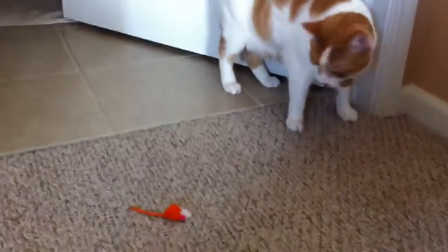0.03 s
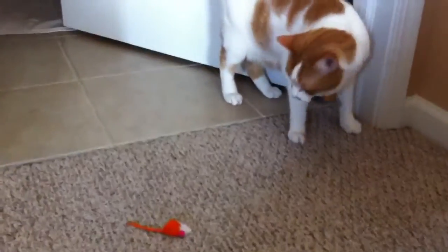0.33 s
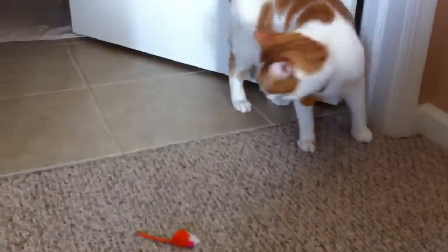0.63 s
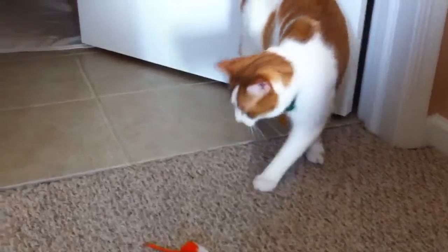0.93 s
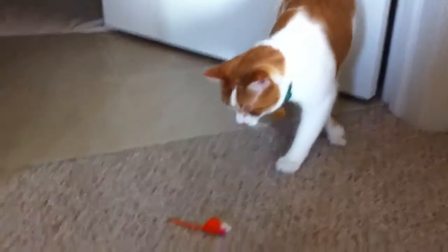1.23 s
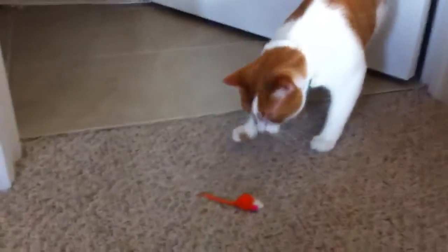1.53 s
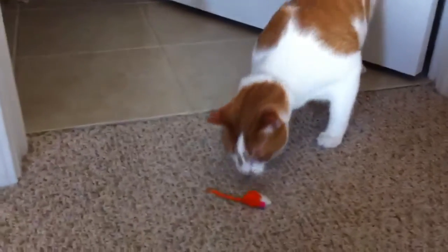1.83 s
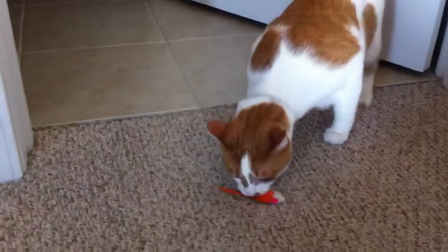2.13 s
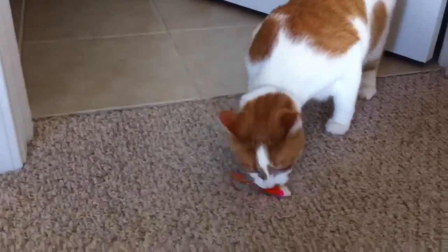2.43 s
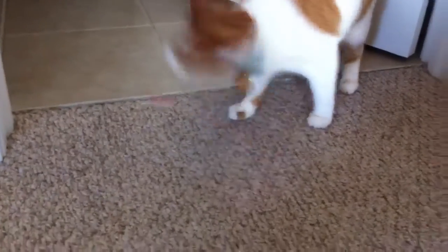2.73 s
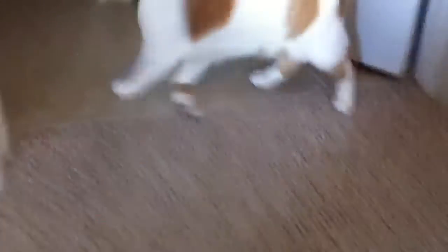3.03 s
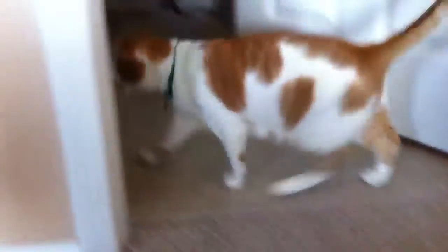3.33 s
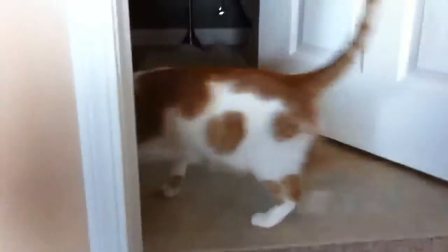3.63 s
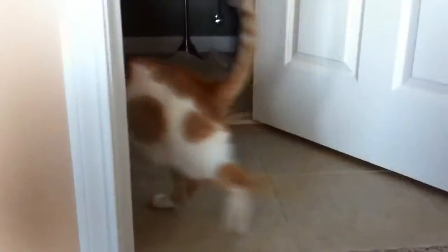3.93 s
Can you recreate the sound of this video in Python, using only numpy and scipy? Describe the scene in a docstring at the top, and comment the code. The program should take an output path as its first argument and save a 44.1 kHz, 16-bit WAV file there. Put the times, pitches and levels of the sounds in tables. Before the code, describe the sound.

A small bell on a cat's collar is the main sound, over faint room hum and hiss. First come a short, stuttering wooden creak around 0.2 to 0.4 seconds and a click at 0.7. The bell tinkles faintly from 2.2 seconds, then gives four bright, high jingles between 2.9 and 3.5. A toy lands with a light knock at 3 seconds, followed by a soft paw thump.

```python
"""Belled cat and toy mouse

A cat noses a toy mouse on a carpet, then starts and trots off through a doorway. The pellet in its
collar bell rattles against the shell, faintly at first, then in four bright jingles. A short creak,
a click, a light knock (probably the flung toy) and a soft footfall sit over a quiet room's hum and hiss."""
import sys
import numpy as np
from scipy import signal
from scipy.fft import rfft, irfft
from scipy.io import wavfile
from scipy.ndimage import uniform_filter1d

SR = 44100
rng = np.random.default_rng(int(sys.argv[2]) if len(sys.argv) > 2 else 0)


def transcribe(u):
    """Save the signal u as a 16-bit wav file named by the first command-line argument.

    u: samples, shape (n,) or (channels, n), limited to [-1, 1]; the rate is SR.
    q: integer samples, one column per channel.
    """
    v = np.clip(np.atleast_2d(u).T, -1, 1)
    q = np.round(v * 32767).astype(np.int16)
    wavfile.write(sys.argv[1], SR, q)


N = 176400
T = np.arange(N) / SR
RING_T = T[:SR // 2]  # half a second for each hit to ring out


def bell():
    """The pellet clacks and rings the shell; where it lands picks the modes, and its contact chokes them."""
    # Each row: start in seconds, clack level in dB, ring levels in dB for the four mode groups
    # near 7, 10, 12 and 14 kHz, factor on the ring time.
    strikes = [(2.155, -60, -84, -62.5, -74, -68, 1), (2.164, -60, -86, -76, -78, -72, 1),
               (2.279, -54, -69.5, -67, -67, -75, 1.1), (2.367, -68, -76, -73, -74, -77, 1),
               (2.412, -68, -82, -74, -79, -72, 1), (2.572, -68, -82, -66, -70, -70, 1.2),
               (2.590, -62, -82, -64, -69, -64, 1.1), (2.665, -55, -87, -70, -78, -75, 0.65),
               (2.683, -63, -87, -65, -78, -77, .6), (2.832, -58, -76, -60, -70, -71, .9),
               (2.839, -60, -79, -64, -71, -82, 0.89), (2.8846, -55, -86, -48, -60, -72, .15),
               (2.9068, -24, -55, -48, -30, -42, 0.29), (2.91, -35, -70, -31, -40, -50, .3),
               (2.9133, -34, -65, -48, -50, -52, 0.28), (2.9167, -29.5, -63, -39, -38, -53, 0.39),
               (2.923, -40, -71, -54, -44, -44, .55), (2.953, -56, -73, -58, -53, -62, 0.67),
               (2.9752, -49, -76, -59, -60, -48, .7), (2.979, -45, -78, -59, -54, -60, 0.4),
               (3.046, -30.5, -54.5, -46, -34, -41, 0.62), (3.0494, -43, -51, -48, -41, -39, 0.6),
               (3.057, -43, -50, -39, -42, -48, 0.2), (3.0653, -39, -70, -35, -42, -36, .25),
               (3.068, -33, -52, -45, -26, -25, 0.2), (3.0717, -33.5, -65, -34.5, -39, -42, 0.47),
               (3.078, -36, -71, -46, -41, -53, .6), (3.151, -58, -78, -55, -60, -63, 0.91),
               (3.229, -51, -84, -56, -58, -78, .6), (3.235, -43.5, -84, -52, -44.5, -75, .7),
               (3.245, -44.5, -84, -53, -47, -74, 0.82), (3.254, -57, -84, -59, -57, -78, 1),
               (3.3758, -34, -60, -36, -51, -50, .25), (3.3785, -52, -73, -28, -55, -68, 0.69),
               (3.3888, -24, -61, -45, -26, -62, 0.31), (3.3945, -25.5, -57, -44, -43, -46, 1),
               (3.403, -39, -70, -56, -45, -42, 1.7), (3.410, -37, -70, -55, -51, -56, .8),
               (3.525, -56, -72, -68, -68, -69, .7), (3.538, -60, -78, -55, -66, -68, 0.88)]
    # The shell's modes. Each row: pitch in Hz, level in dB, t60 in seconds, group (rounded to 0-3).
    shell_modes = [(7170, -0.5, 0.27, 0), (10046, 1.5, 0.079, 1), (9800, -15, 0.057, 1.5),
                   (12360, 3, 0.1, 2), (12800, -8, .06, 2), (13525, -7, 0.1, 3), (14000, -16, 0.066, 3),
                   (14380, 2.5, 0.11, 3), (13600, -10, .03, 3)]
    # The pellet's dry clack. Each row: frequency in Hz, relative level in dB.
    clack_colour = [(900, -44), (2000, -26), (4000, -29), (6500, -25), (8300, -16.5), (9800, -2),
                    (11200, 1), (11900, -0.5), (12450, 8.5), (13200, -12), (14500, -17), (15000, -24)]
    detune_hz = 15.4
    out = np.zeros(N)
    for start, clack_db, *group_db, sustain in strikes:
        shell = 0
        for hz, db, t60, group in shell_modes:
            pitch = hz + detune_hz * rng.standard_normal()
            shell += amp(db + group_db[round(group)]) * ring(pitch, t60 * sustain, rise_s=0.00093)
        clack = amp(clack_db) * burst(clack_colour, t60=0.013, crisp=0.37)
        add(out, start, in_room(shell + clack, wet_db=-10))
    return out


def toy():
    """The toy rustles in the cat's mouth, is flicked away, lands with a light knock and tumbles."""
    # Mouthing and flicking. Each row: start in seconds, level in dB, t60 in seconds.
    nibbles = [(2.025, -63.5, .04), (2.298, -61.5, 0.09), (2.666, -56.5, .03), (2.683, -50.5, 0.024),
               (2.906, -44.5, 0.053)]
    # The landing and its small rebounds. Each row: start in seconds, level in dB.
    bounces = [(2.9914, -34.5), (2.9957, -36), (3.0067, -42), (3.026, -47.5), (3.058, -57.5), (3.101, -48)]
    # A thin rustle and a fuller knock. Each row: frequency in Hz, relative level in dB.
    nibble_colour = [(800, -52), (1600, 3), (2400, -0.5), (3800, -1.5), (5000, -14.5), (9000, -13.5)]
    knock_colour = [(40, -37), (100, -32), (250, -3), (400, -1.5), (650, -3), (850, -1), (1200, -2),
                    (1500, 0.5), (1720, 1), (1950, -3), (2330, 2.5), (2650, -12.5), (4500, -16.5),
                    (7000, -19.5), (14000, -44)]
    rustle, knocks = np.zeros((2, N))
    for start, db, t60 in nibbles:
        add(rustle, start, amp(db) * burst(nibble_colour, t60, crisp=0.06))
    for start, db in bounces:
        knock = amp(db) * burst(knock_colour, t60=0.019, crisp=0.44)
        add(knocks, start, in_room(knock, wet_db=-6.5))
    return in_room(rustle, wet_db=-10) + knocks


def creak():
    """Wood sticks and slips in a quick stutter, each slip a scrape and a short ring."""
    # Each row: start in seconds, level in dB.
    slips = [(.192, -50.5), (.199, -42.5), (.202, -45.5), (.212, -54), (.2155, -53), (.240, -47),
             (.246, -53), (.2505, -48), (.272, -47), (.2755, -41.5), (.280, -45), (.2865, -46), (.290, -43),
             (.295, -44), (.3045, -43.5), (.3145, -49), (.325, -60), (.3855, -46.5), (.3945, -50),
             (.549, -57), (.6045, -66)]
    # Each row: pitch in Hz, level in dB, t60 in seconds.
    wood_modes = [(2216, -5, 0.025), (2480, -5, 0.016), (3360, -13, 0.015), (3610, -14, 0.011),
                  (4730, -15, 0.01), (5400, -23, .008), (1490, -12, 0.01)]
    # Each row: frequency in Hz, relative level in dB.
    scrape_colour = [(600, -34), (1400, -17), (1750, -4), (2250, 6.5), (2650, -1.5), (3000, -11),
                     (3500, -1.5), (4300, -26), (5500, -13.5), (7500, -29)]
    return taps(slips, wood_modes, scrape_colour, grit_db=-7, grit_t60=0.029, wet_db=-16)


def click():
    """Two tiny snaps fuse into one bright, ringing click."""
    # Each row: start in seconds, level in dB.
    snaps = [(.687, -40), (.689, -44)]
    # Each row: pitch in Hz, level in dB, t60 in seconds.
    click_modes = [(2940, -16, .02), (3570, 0.5, 0.018), (3610, 7, 0.013), (4322, -2.5, 0.024),
                   (8070, -16, .025), (11900, -14, .01)]
    # Each row: frequency in Hz, relative level in dB.
    snap_colour = [(1200, -42), (2600, -7), (3800, 0), (4500, -16), (5300, -21), (8500, -23.5),
                   (14000, -27)]
    return taps(snaps, click_modes, snap_colour, grit_db=-4, grit_t60=0.035, wet_db=-23)


def steps():
    """Soft paws thump the floor."""
    # Each row: start in seconds, peak level in dB.
    footfalls = [(3.177, -51), (3.207, -52.5)]
    thump_hz, t60, rise_s = 197.3, 0.13, 0.0042
    out = np.zeros(N)
    for start, db in footfalls:
        thump = ring(thump_hz, t60, rise_s) / fade(t60, rise_s)  # make up the decay during the attack
        add(out, start, amp(db) * thump)
    return out


def rubs():
    """Fur brushes the carpet, and a faint low rumble swells beneath it."""
    # Each row: start in seconds, length in seconds, fur level in dB, rumble level in dB.
    strokes = [(1.957, 0.63, -73.5, -88), (2.801, 0.91, -73.5, -78.5), (3.025, 0.074, -59.5, -73.5)]
    # A soft swish and the rumble under it. Each row: frequency in Hz, relative level in dB.
    fur_colour = [(200, -28), (900, -5), (2400, -0.5), (4000, -6.5), (7000, -15), (15000, -26)]
    rumble_colour = [(20, -14), (45, -7), (90, 3), (160, -31), (400, 0), (2000, -55)]
    freqs = np.fft.rfftfreq(N, 1 / SR)
    out = np.zeros(N)
    for start, length, fur_db, rumble_db in strokes:
        t = np.arange(0, length, 1 / SR)
        fur = amp(fur_db) * shaped_noise(amp(read(fur_colour, freqs)))
        rumble = amp(rumble_db) * shaped_noise(amp(read(rumble_colour, freqs)))
        swell = np.sin(np.pi * t / length)
        add(out, start, swell * (fur + rumble)[:len(t)])
    return out


def air():
    """Steady room noise with faint drifting patches; its hiss is a little brighter at first."""
    # Each row: frequency in Hz, relative level in dB.
    air_colour = [(20, -28.5), (35, -39), (64, -47), (90, -19.5), (140, -11), (185, -10), (245, -7.5),
                  (310, -9), (450, -16), (620, -15.5), (900, -17), (1500, -21), (2100, -21.5), (3800, -27),
                  (6500, -31), (11000, -31.5), (15500, -31.5)]
    level_db, bright_db, settle_s, corner_hz = -63.5, 8.5, 0.11, 3030
    frames, hz = N // 512 + 5, np.fft.rfftfreq(2048, 1 / SR)
    t = np.arange(frames)[:, None] * 512 / SR
    real, imag, patches = rng.standard_normal((3, frames, len(hz)))
    patches = uniform_filter1d(patches, size=8, axis=0)  # smooth in time, then across frequency
    drift_db = evened(uniform_filter1d(patches, size=20, axis=1))
    shelf_db = bright_db * np.exp(-t / settle_s) * hz / (hz + corner_hz)
    spectra = (real + 1j * imag) * amp(read(air_colour, hz) + drift_db + shelf_db)
    noise = signal.istft(spectra.T, nperseg=2048, noverlap=1536)[1][:N]
    return amp(level_db) * evened(noise)


def hum():
    """Wavering ventilation tones, and a thin whine near the end."""
    # Each row: pitch in Hz, rms level in dB, width of the waver in Hz.
    vent_tones = [(247.6, -70, 4.7), (1093, -82.5, 6.4), (1283, -84.5, 3.8), (1434, -81, 2.3)]
    steady_share = 0.89  # of each tone's power
    whine_start, whine_hz, whine_db = 3.52, 4000, -80.5
    freqs = np.fft.rfftfreq(N, 1 / SR)
    fade_in = np.clip((T - whine_start) * 20, 0, 1)
    out = amp(whine_db) * np.sin(2 * np.pi * whine_hz * T) * fade_in
    for hz, db, width in vent_tones:
        tone = np.sqrt(2 * steady_share) * np.sin(2 * np.pi * hz * T)
        waver = np.sqrt(1 - steady_share) * shaped_noise(1 / (1 + ((freqs - hz) / width) ** 2))
        out += amp(db) * (tone + waver)
    return out


def in_room(x, wet_db):
    """Adds dense reflections, new for each sound, each band dying at its own speed."""
    # Each row: frequency in Hz, t60 in seconds.
    decay_times = [(200, 0.87), (1400, 0.32), (4000, 0.67), (10000, 0.37), (15000, 0.22)]
    onset_s = 0.0009
    hz, t, spectra = signal.stft(rng.standard_normal(len(RING_T)), SR, nperseg=256)
    spectra *= fade(read(decay_times, hz)[:, None], t)
    tail = signal.istft(spectra, SR, nperseg=256)[1][:len(RING_T)]
    tail *= np.minimum(RING_T / onset_s, 1)
    return x + amp(wet_db) * signal.fftconvolve(x, tail / np.linalg.norm(tail))[:len(x)]


def taps(events, modes, grit_colour, grit_db, grit_t60, wet_db):
    """Slips or clicks ring the modes of a small body, each with a short spray of contact noise."""
    detune = 0.019  # relative pitch scatter from tap to tap
    out = np.zeros(N)
    for start, level_db in events:
        body = sum(amp(db) * ring(hz * (1 + detune * rng.standard_normal()), t60) for hz, db, t60 in modes)
        grit = amp(grit_db) * burst(grit_colour, grit_t60)
        add(out, start, amp(level_db) * in_room(body + grit, wet_db))
    return out


def burst(colour, t60, crisp=0.23):
    """A spike and a dying puff of noise, coloured together; crisp is the spike's share of the energy."""
    size = len(RING_T)
    gain = evened(amp(read(colour, abs(np.fft.fftfreq(size, 1 / SR)))))
    response = np.exp(np.conj(signal.hilbert(np.log(gain))))  # minimum phase keeps the attack sharp
    puff = np.sqrt(1 - crisp) * np.fft.fft(rng.standard_normal(size) * fade(t60))
    spike = np.sqrt(crisp) * np.linalg.norm(fade(t60))
    return np.fft.ifft((spike + puff) * response).real


def ring(hz, t60, rise_s=0.00025):
    """One struck mode: a dying sine with a quick attack."""
    return np.sin(2 * np.pi * (hz * RING_T + rng.random())) * fade(t60) * np.minimum(RING_T / rise_s, 1)


def shaped_noise(gain):
    """Noise at rms 1, shaped by a gain for each frequency."""
    return evened(irfft(rfft(rng.standard_normal(N)) * gain))


def fade(t60, t=RING_T):
    """Exponential decay, 60 dB down after t60 seconds."""
    return np.exp(-np.log(1000) * t / t60)


def amp(db):
    """Decibels to gain."""
    return 10 ** (np.asarray(db) / 20)


def evened(x):
    """Scales to rms 1."""
    return x / np.sqrt(np.mean(x ** 2) + 1e-20)


def read(points, hz):
    """Reads a curve on a log-frequency axis."""
    freqs, values = np.transpose(points)
    return np.interp(np.log(hz + 1), np.log(freqs + 1), values)


def add(mix, start, sound):
    """Mixes a sound in at a start time in seconds."""
    part = mix[round(start * SR):][:len(sound)]
    part += sound[:len(part)]


def scene():
    """The cat and the room, mixed in mono."""
    return (creak() + click() + bell() + toy() + steps() + rubs() + air() + hum())[None]


def record(dry):
    """A steep low-pass trims the very top of the treble."""
    cutoff_hz = 15820
    lowpass = signal.firwin(1023, cutoff_hz, window=("kaiser", 9), fs=SR)
    return signal.oaconvolve(dry, lowpass[None], "same")


dry = scene()
out = record(dry)
transcribe(out)
```